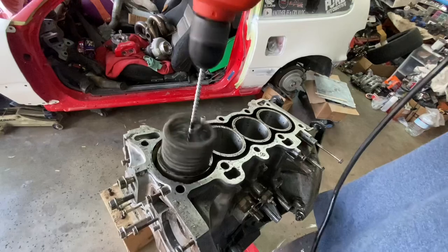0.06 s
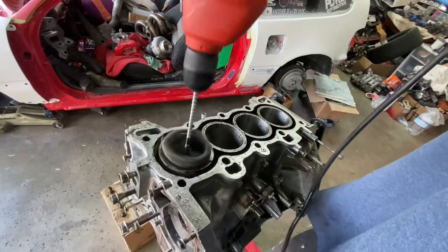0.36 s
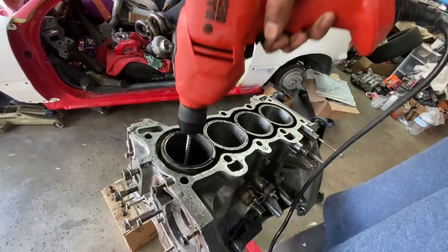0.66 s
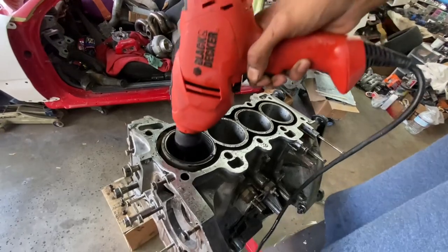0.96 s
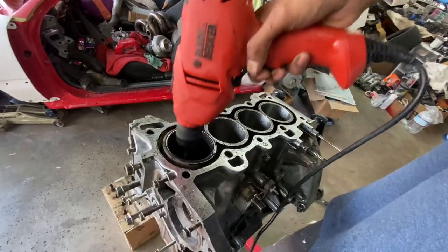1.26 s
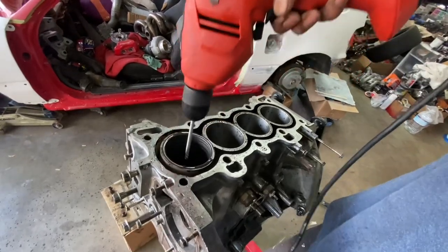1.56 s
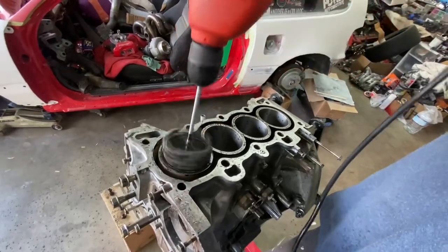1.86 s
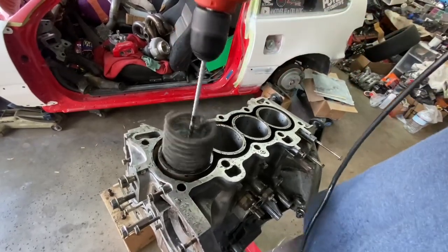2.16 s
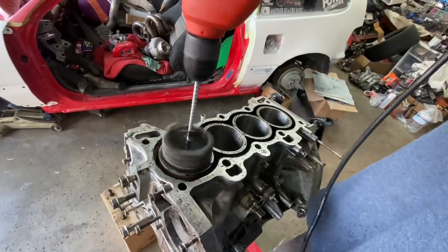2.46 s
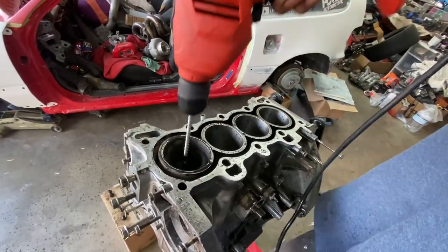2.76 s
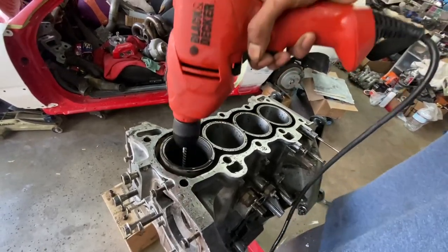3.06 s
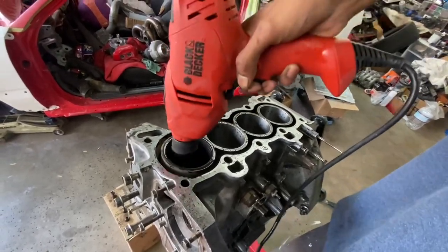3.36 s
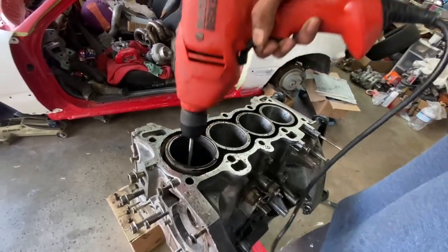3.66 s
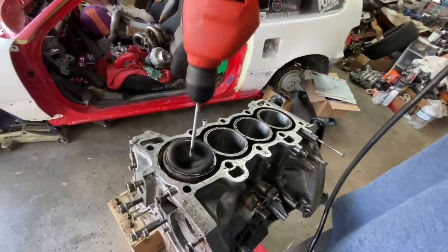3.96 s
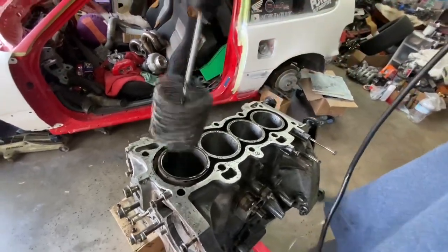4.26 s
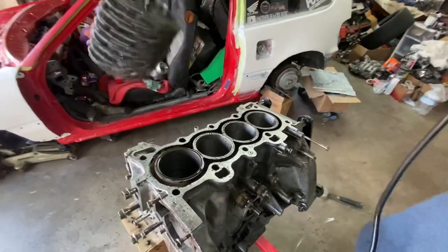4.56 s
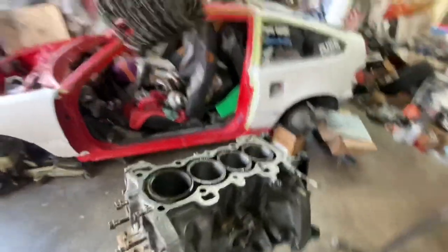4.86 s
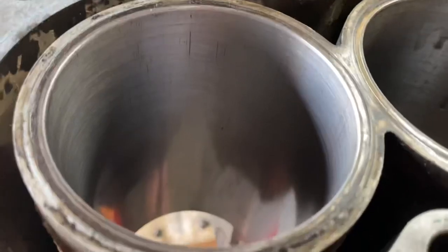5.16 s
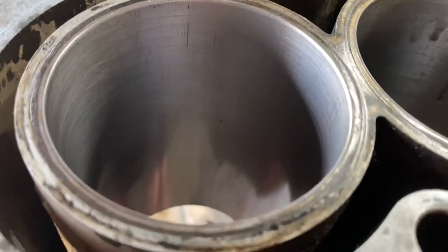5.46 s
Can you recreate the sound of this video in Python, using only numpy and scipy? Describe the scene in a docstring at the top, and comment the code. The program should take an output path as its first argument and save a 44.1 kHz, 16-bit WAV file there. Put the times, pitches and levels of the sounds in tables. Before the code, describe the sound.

In a garage, a corded electric drill spins an abrasive brush inside an engine cylinder. Twice its high gear whine sinks as the brush goes deep, with a motor buzz and swelling gritty hiss, and climbs again as it is pulled back. The trigger is released and the drill coasts down close to the microphone with falling whistles and a rattle. The sound cuts off abruptly, leaving faint electrical hum.

```python
"""In a garage, a corded drill on a half-pulled trigger strokes a ball hone up and down an engine cylinder.
The hone is a brush tipped with gritty balls. Deep in the cylinder its drag slows the motor:
the gear whine sinks, the chopped mains current buzzes and the hiss swells.
The trigger is let go and the drill coasts down; its sound breaks off, leaving a quiet room and mains hum."""
import sys
import numpy as np
from scipy import signal
from scipy.fft import rfft, irfft, next_fast_len
from scipy.io import wavfile
from scipy.ndimage import uniform_filter1d

SR = 44100
rng = np.random.default_rng(int(sys.argv[2]) if len(sys.argv) > 2 else 0)


def to_wav(sig):
    """Store sig (one row per channel, or 1-D mono) as 16-bit WAV at the path in sys.argv[1].

    Samples outside -1..1 are clipped; the rate is SR.
    """
    pcm = np.clip(np.atleast_2d(sig), -1, 1) * 32767
    pcm = np.round(pcm).astype(np.int16)
    wavfile.write(sys.argv[1], SR, pcm.T)  # frames by channels


N = 247381
TIME = np.arange(N) / SR

# How fast the motor spins under power: time_s, turns_per_s
MOTOR_SPEED = [(0.0, 243.9), (0.17, 246.3), (0.3, 236.7), (0.5, 213.2), (0.7, 199.0), (1.0, 180.6),
               (1.41, 166.7), (1.6, 176.6), (1.83, 185.2), (1.97, 201.2), (2.18, 231.1), (2.34, 241.9),
               (2.52, 235.5), (2.78, 210.1), (3.0, 198.8), (3.2, 185.1), (3.4, 177.2), (3.65, 168.4),
               (3.92, 180.1), (4.12, 193.8)]
# Strength of the gear whine at each pitch it passes: pitch_hz, level_db
WHINE_LEVELS = [(3020, -38.5), (3170, -33), (3330, -32.5), (3600, -36.5), (3930, -29.5), (4130, -30),
                (4310, -40)]
# Tones of the nine-tooth motor gear and the fan: cycles_per_turn, level_db
GEAR_TONES = [(4, -46), (8, -46), (9, -37.5), (10, -47), (27, -42.5), (36, -52), (40, -53.5), (45, -49.5),
              (48, -61)]
# How well the case lets those tones out: pitch_hz, gain_db
CASE_LEAK = [(1000, 0), (1550, -7), (1730, 3), (1870, -4), (2080, 3), (2500, -2), (4700, 4), (5300, -9),
             (6500, -13), (7100, -5), (8000, -4), (8700, 0), (10100, -.5), (10600, -12)]
# Pitches at which the drill's shell rings: pitch_hz, width_hz, boost_db
SHELL_RINGS = [(1390, 48, 5), (2426, 71, 6.5), (2690, 110, 5.5), (4600, 210, 1), (8090, 200, 6.5),
               (8900, 270, 2), (9400, 300, 4.5), (10070, 340, 10), (11400, 400, 5), (11900, 300, 7.5)]
# Strength of the motor's buzz at each pitch it passes: pitch_hz, level_db
BUZZ_LEVELS = [(2000, -26.5), (2200, -29), (2330, -31), (2420, -39), (2520, -54), (2950, -40)]
# Tones of the carbon brushes sliding over the motor's contact bars: cycles_per_turn, level_db
BRUSH_TONES = [(20, -55), (24, -48.5), (36, -63), (40, -56), (48, -60), (60, -66), (72, -66), (84, -66),
               (96, -67), (108, -69), (120, -70), (132, -71)]
# Rumble of the hone and the engine block: pitch_hz, level_db
RUMBLE_COLOUR = [(15, -69), (25, -43), (48, -21), (91, -17), (114, -14.5), (147, -13), (227, -6.5),
                 (320, -5.5), (413, -1), (445, -3), (541, -2.5), (637, -6.5), (900, -1.5), (1170, -31.5),
                 (1980, -120)]
# Rattle of the gear case: pitch_hz, level_db
RATTLE_COLOUR = [(300, -25), (600, -12.5), (800, -9.5), (1040, 1.5), (1220, -3.5), (1500, -12.5),
                 (1800, -8.5), (2200, -10), (2600, -20.5), (3500, -16.5), (4300, -15), (6500, -31.5),
                 (10000, -38.5), (16000, -57)]
# Rasp of the scraping hone: pitch_hz, level_db
RASP_COLOUR = [(700, -23), (1500, -3), (2300, -1), (2900, 1), (3300, -1.5), (3700, -4), (4100, -2),
               (5000, -12.5), (5700, -7), (6600, -17), (8000, -22), (10000, -32.5), (16000, -44.5)]
# Hiss of air through the vents: pitch_hz, level_db
HISS_COLOUR = [(2000, -6), (4000, 6), (6000, 1.5), (7500, -1.5), (9500, -2.5), (10600, -6), (11700, -5),
               (12400, -8.5), (13500, -9.5), (16000, -15)]
# How each noise follows the work: base_db, double_speed_db, deep_db, push_db, coast_loss_db, fade_s
RUMBLE_RULE = (-30, 6.5, -1.8, .5, 10, 0.5)
RATTLE_RULE = (-26.5, 10, 1.05, 0.17, 12.5, 0.2)
RASP_RULE = (-32.5, 6.5, 8.5, .3, 19.5, 0.02)
HISS_RULE = (-38.5, 1, 7, 1.14, 24.5, 0.1)
# Moments when the hone is deepest in the cylinder: time_s
DEEPEST = [1.094, 3.39]
# The slack gears rattle harder as the drill is lifted: time_s, boost_db
GEAR_SHAKES = [(4.53, 2), (4.88, 4.5)]
# Mains hum: pitch_hz, with_drill_db, afterwards_db
MAINS_HUM = [(118.5, -54, -67), (242, -59.5, -67.5), (413.5, -55, -76)]
# Low rush of the room: pitch_hz, level_db
ROOM_COLOUR = [(15, -50), (25, -20), (75, 0.5), (204, -8), (233, -1.5), (267, -14), (305, -5.5),
               (359, -12.5), (410, -11), (741, -13), (2060, -29), (9300, -38.5), (15500, -50)]

RELEASE_S, EASE_S, BREAK_S = 4.11, .06, 4.92  # trigger let go, how long that takes, sound breaks off
WORKING_SPEED = 200  # turns per second
MAINS_HZ, MOTOR_BARS, WHINE_CYCLES_PER_TURN = 60, 12, 18
LIFT_DB_PER_S = 12  # the coasting drill is lifted towards the microphone
TOP_HZ = 15800


def drill():
    """Every sound of the tool follows the spinning motor and the stroke of the hone."""
    speed, depth, push, coast_s = motion()
    power = np.clip(.5 + (RELEASE_S - TIME) / EASE_S, 0, 1)
    rotor = angle(speed * (1 + .0015 * wobble(20)))  # how far the motor has turned
    tones = gears(speed, rotor, push, power) + motor_brushes(speed, rotor, power)
    whines = echoed(tones, wet_db=-9, fade_s=.2)
    buzz = echoed(motor_buzz(speed, rotor, push, power), wet_db=-21.5, fade_s=.3)
    return whines + buzz + grinding(speed, rotor, depth, push, coast_s)


def motion():
    """Motor speed, depth of the hone (0 to 1), push (-1 pulled up, 1 pushed down) and time spent coasting."""
    driven = np.interp(np.minimum(TIME, RELEASE_S), *np.transpose(MOTOR_SPEED))
    coast_s = np.maximum(TIME - RELEASE_S, 0)
    friction, air_drag = 87.5, .31  # one brakes the coasting motor steadily, the other more at high speed
    speed = (driven + friction / air_drag) * np.exp(-air_drag * coast_s) - friction / air_drag
    depth = sum(bump(time_s, width_s=.35) for time_s in DEEPEST)
    slowing = -uniform_filter1d(np.gradient(driven, TIME), size=SR // 6)
    push = np.tanh(slowing / 35)  # a motor that slows quickly is being pushed hard
    return speed, depth, push, coast_s


def gears(speed, rotor, push, power):
    """Teeth meeting fast make a whine; slack between them lets the small gear wander as it turns."""
    gear_angle = rotor + .028 * wobble(70) + .022 * wobble(240)
    teeth = tone(WHINE_CYCLES_PER_TURN * gear_angle, blur=.5, flutter_db=2.2)
    rough_teeth = unit(teeth * amp(2.5 * wobble(180)))  # the teeth touch unevenly
    whine_db = np.interp(WHINE_CYCLES_PER_TURN * speed, *np.transpose(WHINE_LEVELS)) + 2.5 * push
    whine = amp(whine_db) * rough_teeth
    strain = amp(.8 * push) * speed / WORKING_SPEED
    others = sum(amp(db) * tone(round(k) * gear_angle, blur=.37, flutter_db=3) for k, db in GEAR_TONES)
    others = shell(strain * others, ring=.88)
    others = filtered(others, lambda hz: amp(np.interp(hz, *np.transpose(CASE_LEAK))))
    imbalance = amp(-40.5) * (speed / 230) ** 4 * tone(rotor, blur=.8, flutter_db=2.5)
    return imbalance + (whine + others) * (power + amp(-24) * (1 - power))


def motor_buzz(speed, rotor, push, power):
    """The trigger passes one burst of current per mains cycle; each burst makes the motor's slots sing."""
    place_in_cycle = (TIME * MAINS_HZ - .62 + .5) % 1 - .5
    burst = unit(np.cos(np.pi * np.clip(place_in_cycle / .41, -.5, .5)))
    buzz_db = np.interp(MOTOR_BARS * speed, *np.transpose(BUZZ_LEVELS)) - 1.5 * push
    powered = burst * amp(buzz_db + .7 * wobble(60))
    coasting = amp(-37.5) * (speed / WORKING_SPEED) ** 4  # with no current: smooth, fading as it slows
    strength = power * powered + (1 - power) * coasting
    return strength * tone(MOTOR_BARS * rotor, blur=.15, flutter_db=1.4)


def motor_brushes(speed, rotor, power):
    """As the motor coasts, its brushes whistle in falling tones; the vents favour the high ones."""
    whistle = sum(amp(db) * tone(round(k) * rotor, blur=.6, flutter_db=2.5) for k, db in BRUSH_TONES)
    whistle = shell(whistle, ring=.25)
    whistle = filtered(whistle, lambda hz: np.interp(hz, [5000, 6000, 12000, 13000], [.4, .9, 1, .35]))
    return whistle * (1 - power) * (speed / 170) ** .7


def grinding(speed, rotor, depth, push, coast_s):
    """Gritty balls drum on the cylinder, loose teeth rattle in the case and the fan blows through vents."""
    def level(base_db, double_speed_db, deep_db, push_db, coast_loss_db, fade_s):
        """Strength of one noise, from its rule."""
        work_db = double_speed_db * np.log2(speed / WORKING_SPEED) + deep_db * depth + push_db * push
        return amp(base_db + work_db - coast_loss_db * np.tanh(coast_s / fade_s))
    lift = amp(LIFT_DB_PER_S * coast_s)
    shakes = amp(sum(db * bump(time_s, width_s=.03) for time_s, db in GEAR_SHAKES))
    drag = amp(.43 * wobble(25))  # the hone drags unevenly
    knocks = amp(.87 * wobble(450) + .75 * np.cos(rotor)) * drag  # uneven hits, stronger once a turn
    rumble = level(*RUMBLE_RULE) * coloured(noise() * amp(wobble(150)), RUMBLE_COLOUR)
    rattle = level(*RATTLE_RULE) * shakes * coloured(shell(noise() * knocks, ring=.31), RATTLE_COLOUR)
    scrape = noise() * knocks
    shallow, deep = [coloured(shell(scrape, ring), RASP_COLOUR) for ring in (.4, 1.3)]
    rasp = level(*RASP_RULE) * (shallow * (1 - depth) + deep * depth)  # rings more near the block
    air = noise() * amp(1.2 * wobble(900)) * drag
    singing, smooth = [coloured(shell(air, ring), HISS_COLOUR) for ring in (.36, .1)]
    hiss = level(*HISS_RULE) * (singing * (1 - depth) + smooth * depth)  # smoother deep down
    return rumble + lift * (rattle + rasp + hiss)


def shell(x, ring):
    """The drill's shell boosts the pitches it rings at; ring sets how strongly (0 is not at all)."""
    def boost(hz):
        return 1 + sum((amp(db) - 1) / (1 + (2 * (hz - pitch_hz) / width_hz) ** 2) ** 2
                       for pitch_hz, width_hz, db in SHELL_RINGS)
    return filtered(x, lambda hz: boost(hz) ** ring)


def echoed(x, wet_db, fade_s):
    """Echoes from the garage walls smear a gliding tone and make it flicker."""
    t = TIME[:SR // 2]
    tail = rng.standard_normal(len(t)) * amp(-60 * t / fade_s) * (t > .004)
    echo = signal.fftconvolve(x, tail / np.linalg.norm(tail))[:N]
    return (x + amp(wet_db) * echo) / np.sqrt(1 + amp(wet_db) ** 2)


def garage(before, after):
    """Mains hum, which swells a little once all is still, and the low rush of the room."""
    swell = amp(np.interp(TIME, [5.13, 5.22], [-5, 1]))
    hum = np.zeros(N)
    for pitch_hz, with_drill_db, afterwards_db in MAINS_HUM:
        strength = amp(with_drill_db) * before + amp(afterwards_db) * after * swell
        hum += strength * tone(angle(np.full(N, pitch_hz)), blur=.35, flutter_db=3)
    rush_level = amp(-53.5) * before + amp(-58.5) * after
    return hum + rush_level * amp(.497 * wobble(14)) * coloured(noise(), ROOM_COLOUR)


def amp(db):
    """Turn decibels into a multiplier."""
    return 10 ** (np.asarray(db) / 20)


def unit(x):
    """Scale a sound to an average strength (rms) of 1."""
    return x / np.sqrt(np.mean(x ** 2) + 1e-20)


def noise():
    """White noise."""
    return rng.standard_normal(N)


def wobble(rate):
    """A smooth curve through about rate random points a second."""
    points = rng.standard_normal(int(N * rate / SR) + 4)
    smooth = signal.resample(points, 8 * len(points))
    return np.interp(TIME * rate, np.linspace(0, len(points), len(smooth), endpoint=False), smooth)


def bump(time_s, width_s):
    """A smooth hill of height 1 around a moment."""
    return np.exp(-((TIME - time_s) / width_s) ** 2)


def angle(turns_per_s):
    """How far something has turned, in radians."""
    return 2 * np.pi * np.cumsum(turns_per_s) / SR


def tone(phase, blur, flutter_db):
    """A single tone whose pitch and strength tremble."""
    return unit(np.sin(phase + blur * wobble(90)) * amp(flutter_db * wobble(35)))


def filtered(x, response):
    """Turn each pitch in x up or down by response(hz)."""
    size = next_fast_len(N + SR // 2)
    return irfft(rfft(x, size) * response(np.fft.rfftfreq(size, 1 / SR)), size)[:N]


def coloured(x, colour):
    """Shape x by a colour table, at strength 1; it falls away below the first pitch."""
    pitches, db = np.transpose(colour)
    def response(hz):
        return amp(np.interp(np.log(hz + 1), np.log(pitches), db)) * np.minimum(hz / pitches[0], 1) ** 2
    return unit(filtered(x, response))


def scene():
    """The drill, a moment of silence, then the quiet room."""
    before = np.clip((BREAK_S - TIME) / .03, 0, 1)
    after = np.clip((TIME - 4.93) / .028, 0, 1)
    return (drill() * before + garage(before, after))[None]


def record(dry):
    """The microphone loses the deepest bass and everything above TOP_HZ."""
    return filtered(dry[0], lambda hz: (hz < TOP_HZ) * hz ** 4 / (hz ** 4 + 38 ** 4))[None]


dry = scene()
out = record(dry)
to_wav(out)
```